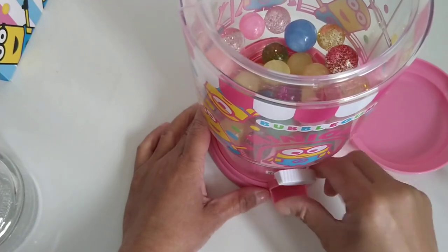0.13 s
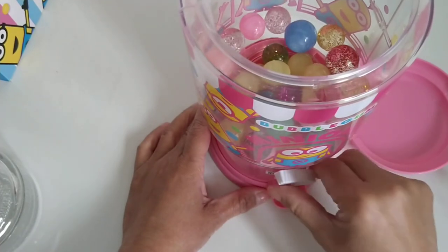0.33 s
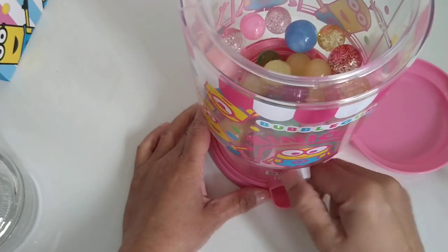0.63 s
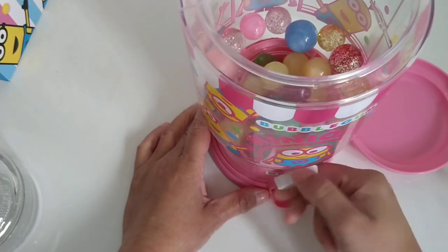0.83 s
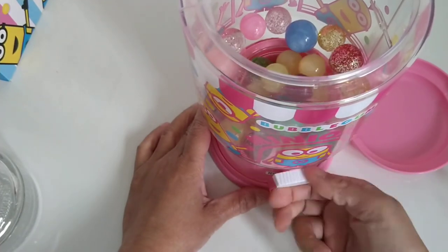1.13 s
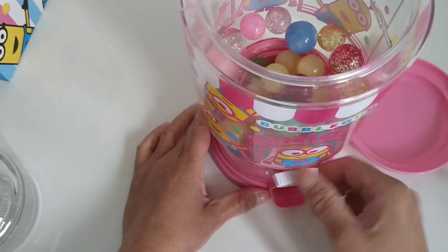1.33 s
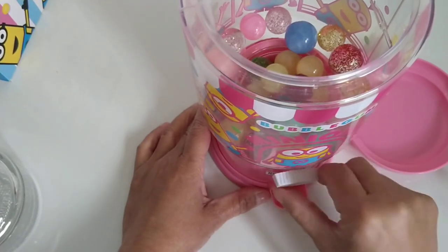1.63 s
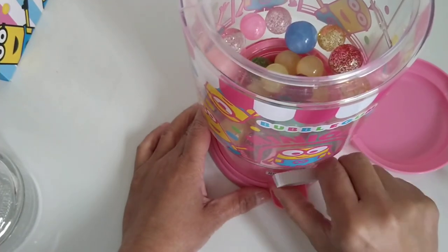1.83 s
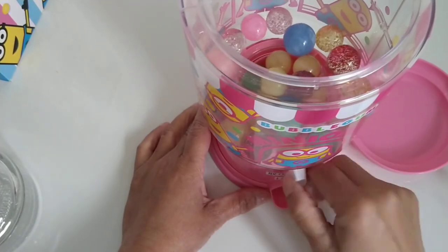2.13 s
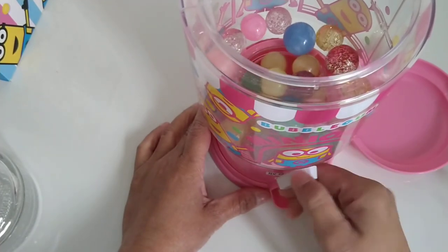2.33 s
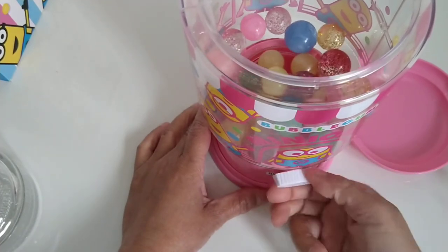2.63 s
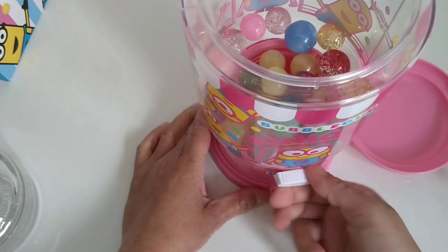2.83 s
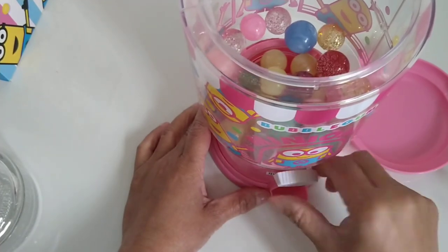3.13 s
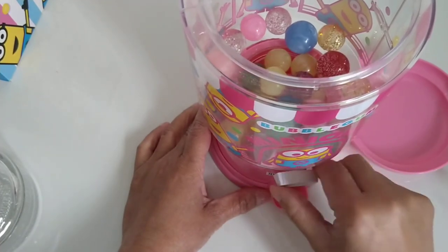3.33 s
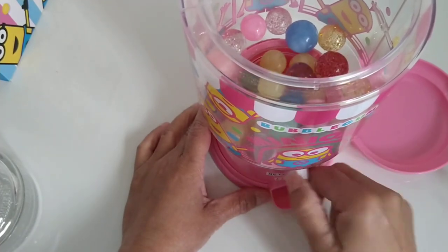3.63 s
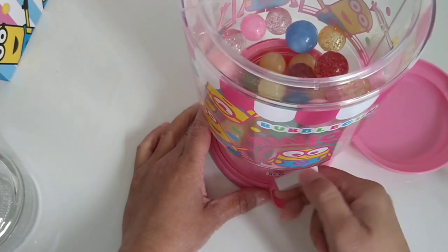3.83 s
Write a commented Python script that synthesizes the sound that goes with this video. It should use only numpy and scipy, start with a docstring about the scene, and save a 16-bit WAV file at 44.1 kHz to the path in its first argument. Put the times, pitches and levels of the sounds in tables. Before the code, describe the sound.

Sharp, hollow ratcheting clicks come from the knob of a plastic toy gumball machine, twisted three times close by in a small, quiet room. Between twists, fingers faintly tap and rub the plastic.

```python
"""On a table in a small room, close by, the knob of a plastic toy gumball machine gets three twists.
A small catch (the pawl) rides up each ratchet tooth and snaps off it, setting the hollow housing and
its thin shell ringing. The knob drags while it turns; between twists fingers tap and rub the plastic
to take a new grip. The hands rock the base with a low rumble, over the faint hush of still air."""
import sys
import numpy as np
from scipy import signal
from scipy.fft import rfft, irfft, next_fast_len
from scipy.io import wavfile

SR = 44100
rng = np.random.default_rng(int(sys.argv[2]) if len(sys.argv) > 2 else 0)


def pcm_store(signal):
    """Save signal as 16-bit PCM."""
    levels = np.round(np.clip(np.atleast_2d(signal), -1, 1) * 32767)
    wavfile.write(sys.argv[1], SR, levels.astype(np.int16).T)


N = 4 * SR
RING_SAMPLES = int(.32 * SR)   # time allowed for the toy or the room to ring out


def from_db(db):
    """Turn decibels into a number to multiply by."""
    return 10 ** (np.asarray(db) / 20)


def fade(t, ring_s):
    """A fade that loses 60 dB in ring_s seconds."""
    return from_db(-60 * t / ring_s)


def rms_one(x):
    """Scale to an average power of 1."""
    return x / np.sqrt(np.mean(x ** 2) + 1e-20)


def energy_one(x):
    """Scale each channel to a total energy of 1."""
    return x / np.sqrt(np.sum(x ** 2, axis=-1, keepdims=True) + 1e-20)


def at_hz(points, hz):
    """Read between the rows of a table, giving each octave equal space."""
    f, value = np.transpose(points)
    return np.interp(np.log(np.maximum(hz, 1)), np.log(f), value)


def colour(x, points):
    """Shape a sound's tone with a table of (frequency [Hz], level [dB])."""
    n = x.shape[-1]
    return irfft(rfft(x) * from_db(at_hz(points, np.fft.rfftfreq(n, 1 / SR))), n)


def cut_bass(x, hz):
    """Weaken everything below hz."""
    return signal.sosfilt(signal.butter(2, hz, "high", fs=SR, output="sos"), x)


def pan(db):
    """Two gains that make the left side db louder than the right."""
    return from_db(np.array([[db], [-db]]) / 2)


def through(x, response):
    """Let every sample of x set off a stereo ring."""
    return signal.fftconvolve(np.atleast_2d(x), response, axes=-1)[:, :N]


def delayed(x, seconds):
    """Delay a sound, even by part of a sample."""
    n = next_fast_len(N + SR // 10)
    return irfft(rfft(x, n) * np.exp(-2j * np.pi * np.fft.rfftfreq(n, 1 / SR) * seconds), n)[..., :N]


def stereo_noise(size, likeness):
    """White noise whose two sides are unrelated (likeness 0) up to identical (1)."""
    mid, side = rng.standard_normal((2, size))
    return (np.sqrt(1 + likeness) * mid + np.sqrt(1 - likeness) * side * [[1], [-1]]) / np.sqrt(2)


def blend(kept, fresh, fresh_share):
    """Mix two unrelated sounds, keeping the power steady."""
    return np.sqrt(1 - fresh_share) * kept + np.sqrt(fresh_share) * fresh


def swell(peak_s, rise_s, fall_s, db):
    """A level that rises to a peak and falls away."""
    t = np.arange(N) / SR - peak_s
    return from_db(db) * np.exp(-.5 * (t / np.where(t < 0, rise_s, fall_s)) ** 2)


def hush(tone, likeness):
    """Steady shaped noise, leaning to the left."""
    return rms_one(colour(stereo_noise(N, likeness), tone)) * pan(1.5)


# Tone of the still air: (frequency [Hz], level [dB])
AIR_TONE = [(20, 1), (45, -4), (120, -8), (175, -21), (260, -24.5), (380, -10.5), (500, -18), (1000, -16.5),
            (2000, -23.5), (4000, -33), (8000, -44), (15000, -37.5)]
def room_air():
    """Still air makes a faint, even hush."""
    return from_db(-65) * hush(AIR_TONE, likeness=0.75)


# Tone of touched plastic: (frequency [Hz], level [dB])
PLASTIC_TONE = [(200, -10.5), (370, 4.5), (650, 11.5), (900, 7.5), (1400, 10), (2000, 2.5), (3100, -5.5),
                (3400, 4), (3750, -5.5), (4500, -6.5), (4800, -1), (5300, -12), (7500, -18), (11500, -18),
                (12600, -14), (14000, -16)]
def plastic(force):
    """The plastic answers a touch more strongly at some pitches than at others."""
    return colour(force, PLASTIC_TONE)


# A fingertip meets the knob: (time [s], level [dB])
FINGER_TAPS = [(.056, -21.5), (0.556, -20), (2.04, -26), (3.128, -30.5)]
def finger_taps():
    """Each soft tap is one tiny push on the plastic."""
    pushes = np.zeros(N)
    for time_s, db in FINGER_TAPS:
        pushes[int(time_s * SR)] = from_db(db)
    return plastic(pushes)


# Tone of the room's echo: (frequency [Hz], level [dB])
ECHO_TONE = [(130, -8), (205, 2), (260, -2.5), (370, 12), (460, 13.5), (630, 22), (800, 4.5), (2000, 2),
             (3300, 4), (5400, 1), (6500, -0.5), (11400, -6), (13700, 6), (15600, 2.5)]
# How long that echo lasts: (frequency [Hz], time to fade 60 dB [s])
ECHO_TIMES = [(150, 0.3), (600, 0.21), (1500, 0.17), (4000, 0.25), (8000, 0.23), (15000, 0.13)]
def room_echo(bands=8, build_s=0.012):
    """Reflections from all sides blur into a tail that builds quickly and lasts longest in the bass."""
    t = np.arange(RING_SAMPLES) / SR
    spectrum = rfft(colour(stereo_noise(len(t), 0.14), ECHO_TONE))
    hz = np.fft.rfftfreq(len(t), 1 / SR)
    centres, tail = np.geomspace(120, 16000, bands), 0
    for centre, share in zip(centres, np.eye(bands)):
        band = irfft(spectrum * at_hz(list(zip(centres, share)), hz), len(t))
        tail = tail + band * fade(t, at_hz(ECHO_TIMES, centre))
    return from_db(-4.5) * energy_one(tail * (1 - np.exp(-(t / build_s) ** 2)))


def tiny_slips(per_second=5100, spread_db=2.5):
    """Rubbing is thousands of tiny slips of uneven strength."""
    slips = (rng.random(N) < per_second / SR) * rng.choice([-1, 1], N)
    return slips * from_db(spread_db * np.minimum(rng.exponential(1, N), 4))


# Fingers take a new grip: (peak time [s], rise [s], fall [s], level [dB], rasp pitch [Hz])
FINGER_RUBS = [(.105, 0.025, 0.021, -46.5, 3250), (.565, 0.021, 0.014, -50.5, 1417),
               (1.46, 0.024, 0.016, -50, 4680), (1.68, 0.042, 0.033, -62.5, 1880),
               (1.841, 0.031, 0.027, -58, 3593), (1.948, 0.019, 0.017, -52.5, 3430),
               (2.048, 0.016, 0.0085, -48.5, 933), (3.174, 0.018, 0.026, -57.5, 6400),
               (3.323, 0.028, 0.023, -65.5, 4000), (3.409, 0.0084, 0.029, -62.5, 2700)]
def finger_rubs(slips, rasp_width_hz=280):
    """Skin slides over the plastic, each stroke rasping at its own pitch."""
    rubbing, out = rms_one(plastic(slips)), 0
    for *stroke, hz in FINGER_RUBS:
        rasp = rms_one(signal.lfilter(*signal.iirpeak(hz, hz / rasp_width_hz, fs=SR), slips))
        out = out + swell(*stroke) * (rubbing + from_db(-8) * rasp)
    return out


# Pushes on the base: (peak time [s], rise [s], fall [s], level [dB])
BASE_PUSHES = [(.46, 0.08, 0.045, -62), (.85, 0.1, 0.22, -56.5), (2.25, .2, 0.39, -64),
               (2.72, .08, 0.12, -61), (3.8, 0.33, 0.39, -63.5)]
# Tone of its rumble: (frequency [Hz], level [dB])
RUMBLE_TONE = [(20, -11), (45, 7.5), (120, 1), (200, -9), (600, -36), (2000, -65.5)]
def rocking_base():
    """The hands rock the base on the table, making swells of low rumble."""
    return sum(swell(*push) for push in BASE_PUSHES) * hush(RUMBLE_TONE, likeness=0.25)


# The knob is turning: (start [s], end [s])
TWISTS = [(0.578, 0.99), (2.051, 1.8), (3.519, 6)]
def knob_drag(slips):
    """The axle rubs on the plastic. The middle row ends before it starts, so it adds no drag."""
    t = np.arange(N) / SR
    turning = sum((t > start) & (t < end) for start, end in TWISTS)
    return from_db(-58) * rms_one(plastic(slips)) * turning


# Where a click's tone is set, from thud up to fizz: (frequency [Hz])
SNAP_BANDS_HZ = (370, 530, 660, 1500, 3250, 4200, 5600, 9500, 13700)
def pawl_snap(band_db, size, scrape_s=0.00037, rattle_s=0.0015):
    """The catch scrapes up a tooth, snaps off at the middle sample and rattles as it lands."""
    t = (np.arange(size) - size // 2) / SR
    rough = cut_bass(rng.standard_normal(size), hz=1607)
    scrape = from_db(-7.5) * energy_one(rough * (t < 0) * np.exp(-abs(t) / scrape_s))
    snap = t == 0
    rattle = from_db(-9) * energy_one(rough * (t > 0) * abs(t) * np.exp(-2 * abs(t) / rattle_s))
    return colour(energy_one(scrape + snap + rattle), list(zip(SNAP_BANDS_HZ, band_db)))


# Tone of the thin shell: (frequency [Hz], level [dB])
SHELL_TONE = [(250, -32.5), (450, 1.5), (900, -2.5), (1550, 0), (2000, -3), (3300, -1), (4600, 3),
              (5600, 0.5), (6300, -2.5), (7800, -1), (9000, -6.5), (10300, -5), (11400, -6), (12500, -3.5),
              (13900, -0.5), (15400, 0)]
def shell_ring(shell_noise):
    """The shell's crowded notes blur into noise; the clear globe rings on a little longer."""
    t = np.arange(RING_SAMPLES) / SR
    shell = energy_one(fade(t, ring_s=0.036))
    globe = from_db(-11) * energy_one(fade(t, ring_s=0.093))
    # the contact moves from tooth to tooth, so no two rings are quite alike
    noise = blend(shell_noise, stereo_noise(len(t), 0.2), fresh_share=0.4)
    return from_db(6) * energy_one(np.hypot(shell, globe) * colour(noise, SHELL_TONE))


# Strong notes of the housing: (pitch [Hz], level [dB], time to fade 60 dB [s], left over right [dB])
HOUSING_NOTES = [(207.1, -48, 0.13, 4), (361.4, -34.5, 0.11, -2), (531.4, -21, 0.048, -2),
                 (631.6, -20, 0.05, -4), (1393, -32, 0.037, 3), (2403, -32, 0.041, -2),
                 (2628, -34, 0.045, -2), (3127, -29.5, 0.026, -13), (3493, -28, 0.042, 0.5),
                 (4008, -21.5, 0.023, -12.5), (4280, -33, 0.03, -8), (5304, -15.5, 0.0099, -1),
                 (13430, -24, 0.015, -1.5)]
def housing_ring(spread_db=1.2, detune=0.0042):
    """A blow rings the hollow housing's own notes, with slightly new levels and pitches each time."""
    t = np.arange(RING_SAMPLES) / SR
    out, average_side_db = 0, np.mean(HOUSING_NOTES, axis=0)[-1]
    for k, (hz, db, ring_s, side_db) in enumerate(HOUSING_NOTES):
        build_s = 0.0039 if hz < 450 else 0.00022   # the base's low notes swell slowly, the walls' fast
        louder, sharper = rng.standard_normal(2)
        level = from_db(db + spread_db * louder) * fade(t, ring_s) * (1 - np.exp(-(t / build_s) ** 2))
        note = (-1) ** k * np.sin(2 * np.pi * hz * (1 + detune * sharper) * t)
        out = out + pan(side_db - average_side_db) * level * note
    return out


# One click per tooth: (time [s], level [dB], thud [dB], low knock [dB], high knock [dB], middle [dB],
# low ring [dB], high ring [dB], treble [dB], fizz [dB], left over right [dB])
TOOTH_CLICKS = [(0.5803, 2.5, -3.5, -3, -7.5, 3, 0, -4, -3, -2, -3.5),
                (0.6675, 1.5, 0, 0, -4.5, 1, -3, -3.5, 0.5, -3, -2.5),
                (0.7332, 3.5, -5, -5, -7, -3.5, 0, 2.5, 3, -2.5, -3.5),
                (0.857, 5.5, -4, -6.5, -5, -4.5, -3, -2, -2.5, -3, -3.5),
                (0.9772, 1.7, -2, 0, -4.5, 0, -3.5, -0.5, 0.5, -1, -4),
                (1.1286, -4, 2, 2.5, 4.5, -2.5, 3, 7.5, 13, 6.5, -1.5),
                (1.233, -2.5, 6, -1, -2, 10, -1, -4.5, 3, -2.5, -3.5),
                (2.0558, -1, -5, 2, -1, -1, 2, -0.5, -6, 2, -1.5),
                (2.103, 1.16, -3, 0, -3.5, -0.5, 4, -2.5, 0, 4, -2),
                (2.2125, 1.8, -1.5, 0, -4.5, -0.5, 3, -1, 4, 2.5, -1.5),
                (2.3196, -2.5, 3.5, 5, 0, 4, 4.5, 9.5, 12, 5.5, 0.5),
                (2.396, 2, -2.5, 0, -1, -3, 2, 2.5, 3.5, 1, -1.5),
                (2.5006, 0.24, 3, 3, 2, 2, 3.5, 2, 3.5, 6, -2),
                (2.5923, 2.5, -1, -1, -1, -2, 1.5, 0, 3.5, 3.5, 1),
                (2.714, -5, 6.5, 2, 4, 1.5, 8, 2, 6, 2, -2.5),
                (3.5192, -1.5, -3.5, -2.5, -1.5, 0, -2.5, -0.5, -1.5, -0.5, -0.5),
                (3.5841, 1.85, -5.5, -3.5, -3, -4, -3, -9, 1.5, -0.5, -1.5),
                (3.6828, 1.5, -0.5, 2.5, -3, 1.5, -9.5, -5, 1.5, -3, -2),
                (3.7841, 1.1, -2.5, -1.5, -2.5, 3, -1, -3.5, 3.5, -1.5, -3),
                (3.8673, 4.5, 0, -6.5, 2, -3.5, 0, -0.5, 2.5, -2, -3.5),
                (3.9898, 2.3, -6, -0.5, -5.5, -2.5, 0, -0.5, 1.5, -0.5, -3)]
def ratchet(room, size=2048):
    """Every tooth snaps the catch against the housing, and the room answers."""
    out, shell_noise = np.zeros((2, N + 2 * SR)), stereo_noise(RING_SAMPLES, 0.12)
    for time_s, db, *body, treble, fizz, side_db in TOOTH_CLICKS:
        force = from_db(db) * pawl_snap((*body, 0, treble, fizz), size)   # 5600 Hz stays at 0 dB
        click = pan(side_db) * through(force, shell_ring(shell_noise) + housing_ring())
        # the moving hand changes the reflections
        tail = through(force, blend(room, room_echo(), fresh_share=0.42))
        start = int(time_s * SR) - size // 2
        out[:, start:start + click.shape[1]] += click + tail
    return out[:, :N]


def scene():
    """Fingers, knob and ratchet sound in the room, over the rocking base and still air."""
    room, slips = room_echo(), tiny_slips()
    t = np.arange(RING_SAMPLES) / SR
    touches = finger_taps() + finger_rubs(slips) + knob_drag(slips)
    plastic_ring = energy_one(stereo_noise(len(t), 0.46) * fade(t, ring_s=0.058))
    handling = from_db(-5) * through(touches, plastic_ring)
    toy = handling + from_db(-14) * through(handling, room) + ratchet(room)
    toy = cut_bass(toy, hz=169)   # the small toy gives off no deep bass
    bounce = from_db(-20) * delayed(toy[::-1], seconds=.0092)   # off a nearby surface, sides swapped
    left, right = toy + bounce
    right = delayed(right, seconds=.000016)   # the right microphone hears the toy a moment later
    return np.array([left, right]) + rocking_base() + room_air()


def record(dry, ceiling=.85, cutoff_hz=16000):
    """Round off the tallest peaks and cut away the very highest treble."""
    rounded = ceiling * np.tanh(dry / ceiling)
    return signal.sosfilt(signal.ellip(10, .1, 80, cutoff_hz, fs=SR, output="sos"), rounded)


dry = scene()
out = record(dry)
pcm_store(out)
```